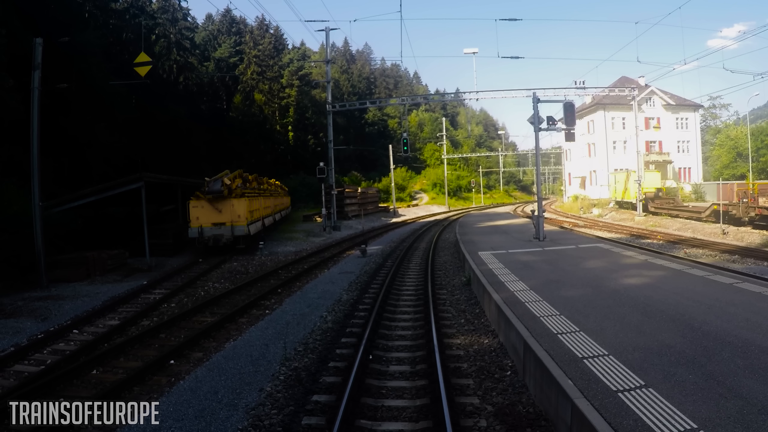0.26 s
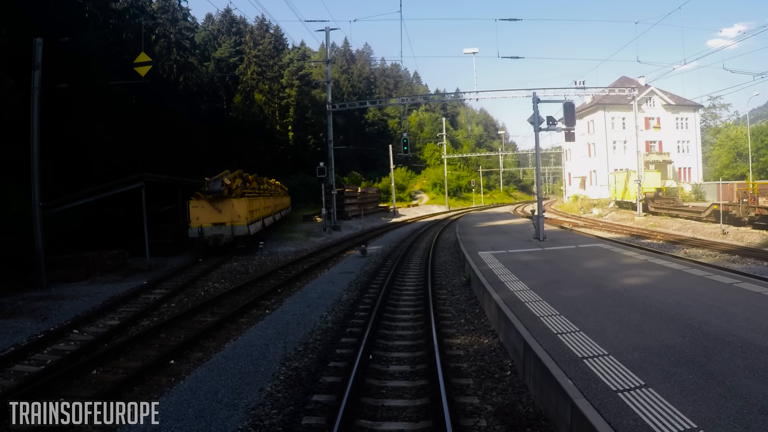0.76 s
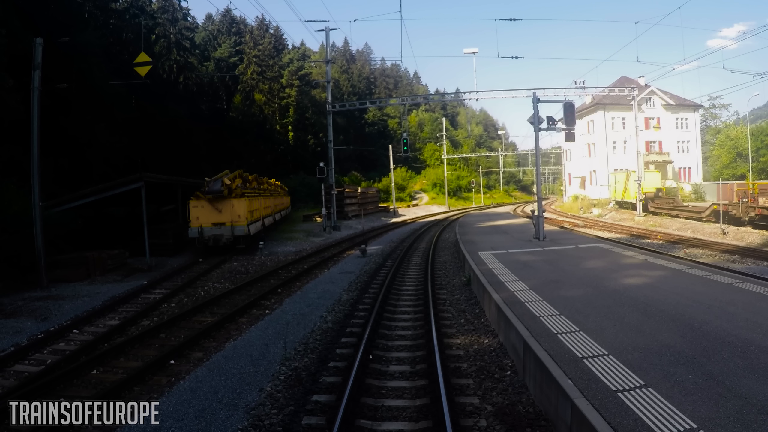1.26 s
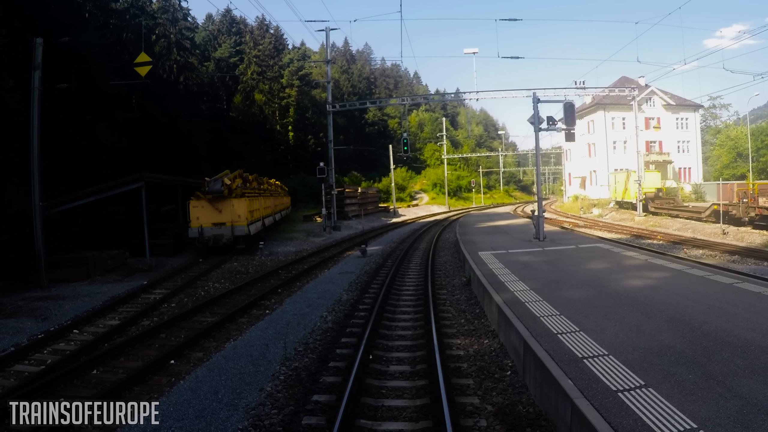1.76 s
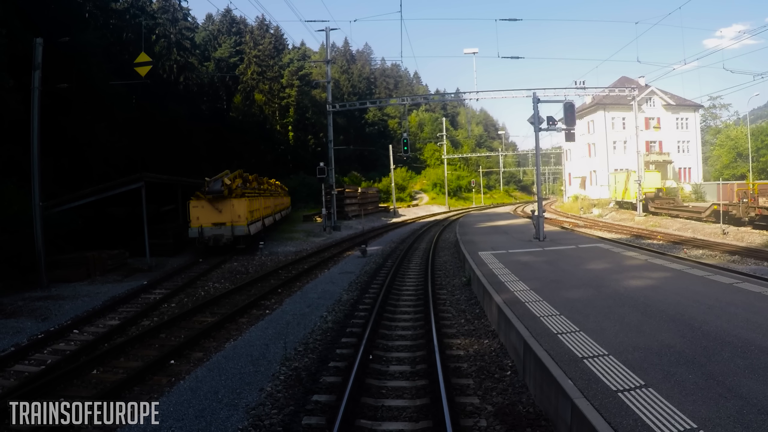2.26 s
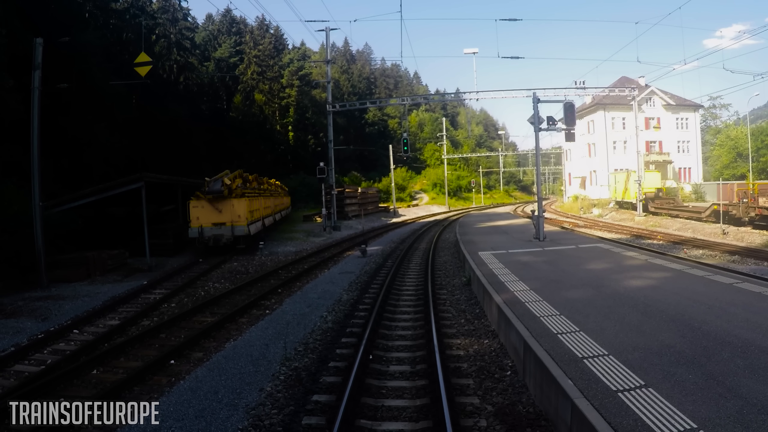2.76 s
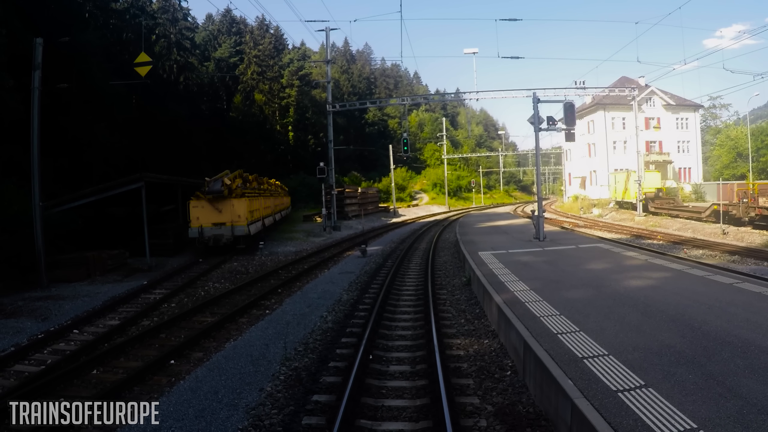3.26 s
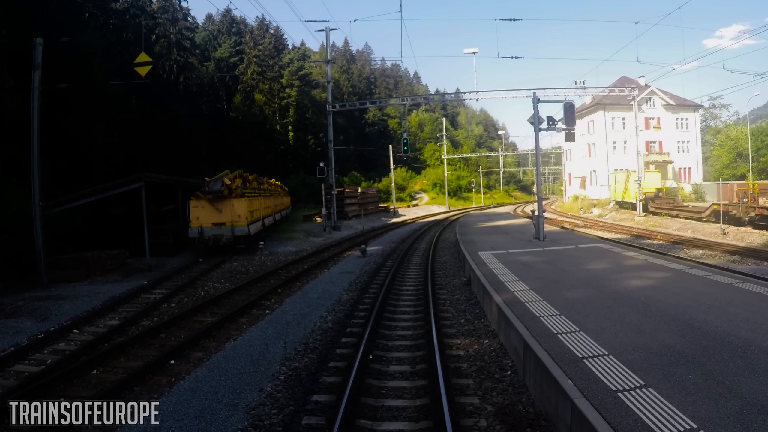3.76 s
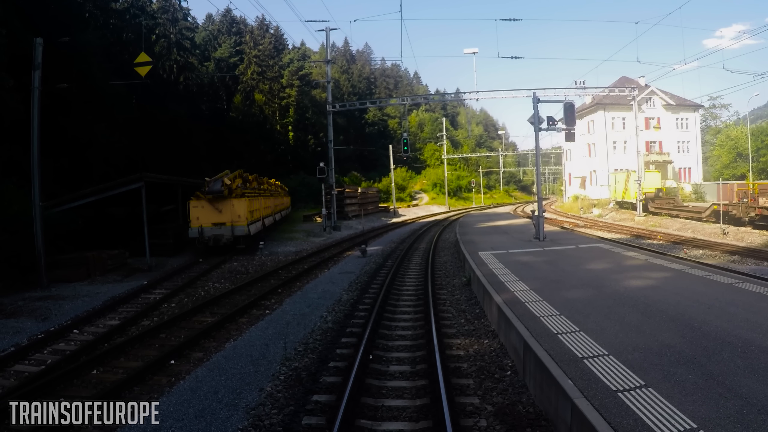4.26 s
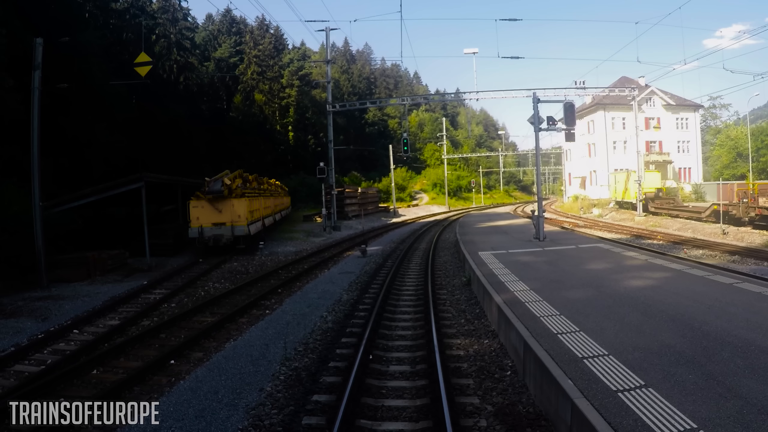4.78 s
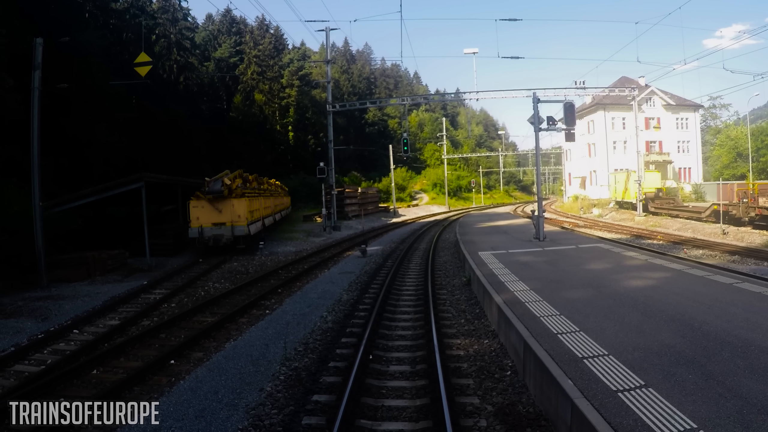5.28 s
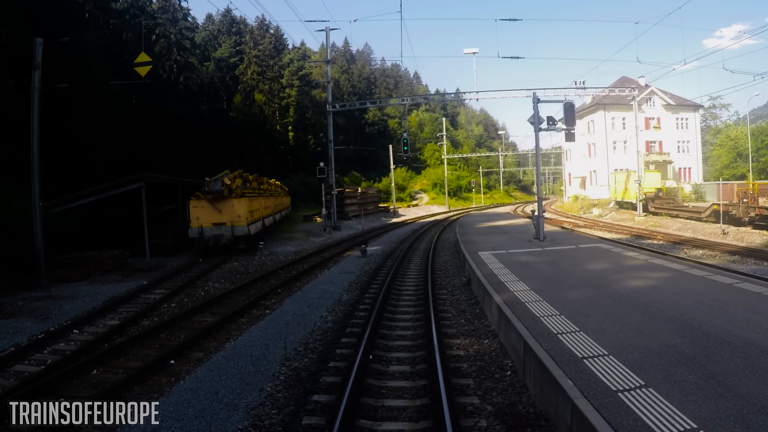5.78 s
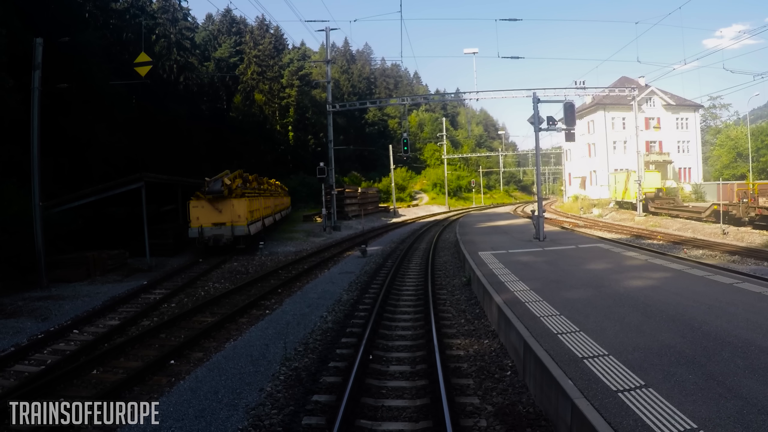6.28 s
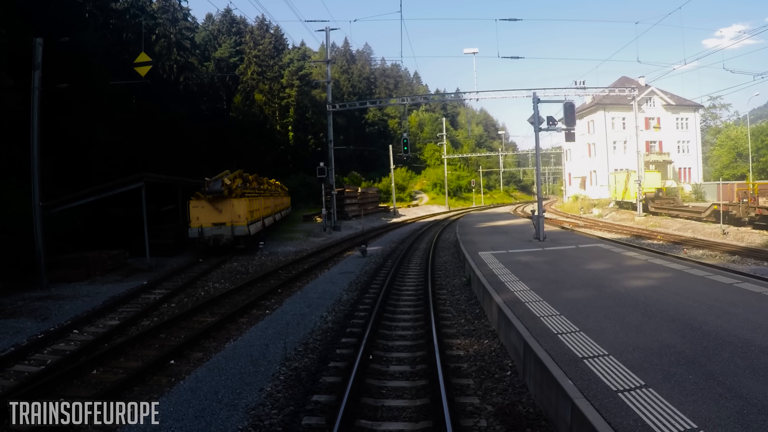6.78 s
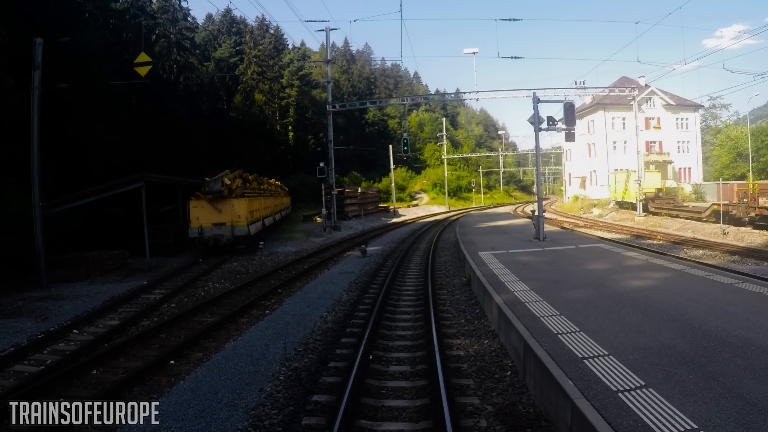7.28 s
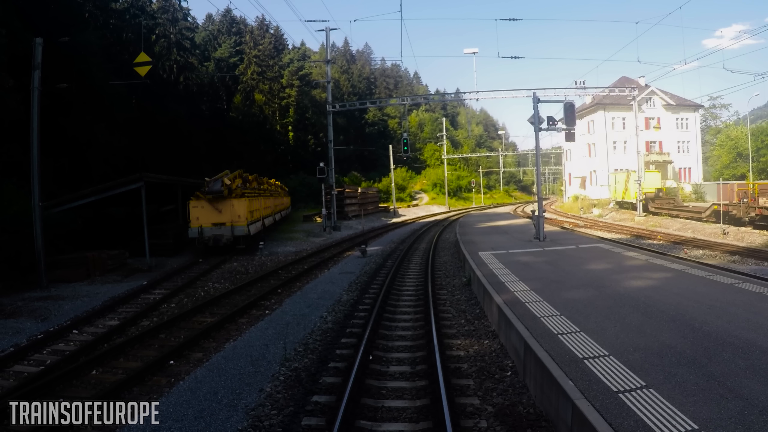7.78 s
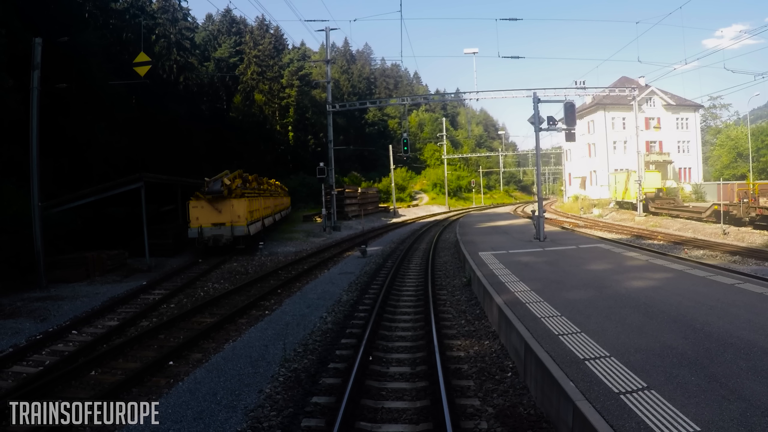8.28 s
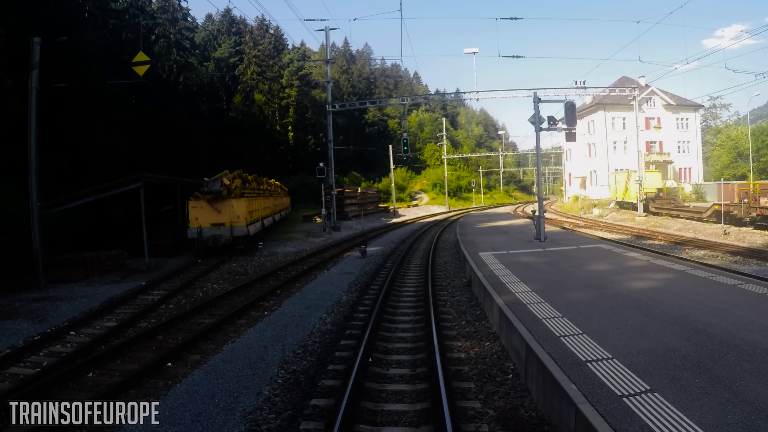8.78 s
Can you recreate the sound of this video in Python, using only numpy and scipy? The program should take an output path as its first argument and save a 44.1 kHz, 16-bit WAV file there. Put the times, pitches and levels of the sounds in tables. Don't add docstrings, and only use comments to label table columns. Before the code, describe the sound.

Low beating machine hum and muffled rushing air fill a train cab, broken by two hard lever clacks about a second apart.

```python
import sys
import numpy as np
from scipy import signal
from scipy.fft import rfft, irfft
from scipy.io import wavfile
from scipy.ndimage import uniform_filter1d

SR = 44100
rng = np.random.default_rng(int(sys.argv[2]) if len(sys.argv) > 2 else 0)


def dump_mix(stems):
    frames = np.atleast_2d(stems).T
    limited = np.clip(frames, -1, 1)
    pcm = np.round(limited * 32767).astype(np.int16)
    wavfile.write(sys.argv[1], SR, pcm)


def level_to_linear(level):
    exponent = np.asarray(level, float) / 20
    return 10 ** exponent


N = 398663
TIME = np.arange(N) / SR

# centre_hz, width_hz, level_db [dB per Hz]
CAB_MODES = [(45.3, 9, -50.5), (70, 7.1, -65.5), (142.7, 12.5, -57.5), (193, 70, -66.5), (233, 21, -63),
             (249.6, 12.6, -59.5), (278.3, 29, -63), (305, 13.8, -57), (384.8, 28.4, -59.5),
             (431.6, 47, -64), (455, 11, -79), (503, 134, -69.5),
             (597, 77, -68.5), (649, 7.7, -71), (695, 100, -76), (798, 55, -72.5), (818, 41, -68.5),
               (929, 48, -72.5), (982, 250, -82.5), (1104, 26, -82.8), (1207, 62, -76.5), (1274, 72, -79.5),
               (1348, 102, -82), (1507, 33, -83), (1674, 140, -84.5), (1850, 110, -91), (1947, 103, -89),
               (2203, 50, -96.5), (2334, 60, -91.5), (2525, 79, -85), (2970, 450, -100.6),
             (3580, 220, -100), (4230, 52, -101), (4800, 420, -106)]
# pitch_hz, level_db [dB per Hz]
AIR_FLOOR = [(20, -76), (110, -78), (350, -90), (3300, -106), (6400, -108), (7200, -112.5), (9000, -113),
             (10600, -112), (13300, -113), (14000, -117), (14600, -113), (15300, -119)]
# start_s, hiss_db, buzz_db
VALVE_AND_PANEL = [(0, -70, -69), (.8, -71.5, -55), (2, -70, -74), (3.5, -73, -65), (3.75, -65.5, -68),
                   (4.5, -64, -56), (5.5, -67.5, -57.5), (5.9, -71, -51), (7.1, -70, -63), (7.3, -72, -48),
                   (7.65, -67, -46), (7.82, -68, -65), (8.0, -68.5, -45), (8.28, -69, -57), (8.5, -72, -52),
                   (9.04, -68, -51)]
# shaft_hz (or base pitch of a hum), multiples of it that sound
MACHINE_SHAFTS = [
    (48.05, (2, 4, 11, 14, 15)),
    (41.85, (5, 10)),
    (51.08, (5, 6, 7, 8, 9)),
    (51.08, (42, 44, 45, 46, 47, 48)),
    (25.09, (7, 9, 11, 18)),
    (16.675, (2, 4, 8, 26)),
    (1, (69.75, 100.9, 139.1, 145.9, 201.8, 249.1, 594.4, 616.2, 965, 1749.2, 1782.8)),
]
MACHINE_TONES_DB = [
    [-57.5, -54.5, -63, -60.5, -66.5],
    [-39, -47],
    [-47.5, -56, -68.5, -55.5, -55],
    [-83, -90, -75, -78, -83, -75.5],
    [-61.5, -51.5, -60.5, -54],
    [-61, -49.5, -55, -51.5],
    [-64.5, -64, -62.5, -61.5, -55, -56, -57.5, -57.5, -64.5, -66.5, -79],
]
MACHINE_WAVER_DB = [2.3, 1.6, 2.4, 1.6, 4.5, 0.57, 2.1]
# start_s, level_db of its shaft tone
BLOWER_LOAD = [
    (0, -34),
    (3.5, -38.5),
    (6.2, -32),
    (9.04, -35),
]
# shaft_hz, level_db, in_step_s (moment in step with it), waver_db
BEATING_SHAFTS = [
    (48.65, -43.5, 4.844, .8),
    (41.81, -45, 4.6, 2),
    (51.08, -53, 4.681, 1.5),
    (45.16, -53, 4.729, 2.5),
]
# start_s, peak_db, rattle_ms, centre_hz, breadth_octaves
LEVER_KNOCKS = [(2.976, -49, 8, 2700, 1.4), (3.055, -28, 11, 1900, 3.2), (3.071, -18.5, 3.5, 1500, 7.1),
                (3.071, -49, 4, 5000, 0.78), (3.074, -20, 5.5, 420, 1.7), (3.076, -26.5, 6.3, 150, 0.75),
                (3.083, -18.5, 4, 930, 0.81), (3.097, -25, 4.8, 270, 0.68), (3.117, -23.5, 7.1, 245, 0.88),
                (3.892, -38.5, 5.3, 1800, 0.59), (3.914, -41, 2.5, 1800, .55),
                (4.23, -23.5, 4.4, 1510, 0.85), (4.231, -46, 5, 5200, 1.6), (4.231, -25.5, 3.9, 840, 0.68),
                (4.245, -21, 8.7, 380, 2.1), (4.251, -29.5, 15, 1240, 2.3)]
# pitch_hz, t60_s, level_db
DESK_MODES = [(142, 0.26, -5), (221.8, 0.26, 0), (270, 0.56, -7.5), (306, 0.088, -17), (380, 0.15, -7.5),
              (445, 0.11, -2), (496, 0.085, -8.5), (642, 0.09, -14), (775, 0.052, 0.5), (930, 0.077, -3.5),
              (1044, 0.041, -5.5), (1176, 0.064, -6.5), (1302, 0.073, -6), (1370, 0.063, -14.5),
              (1580, 0.06, -30), (1672, 0.08, -10.5), (1900, 0.052, -12.5), (1974, 0.04, -15),
              (2336, 0.096, -17), (2525, 0.082, -11), (2830, 0.033, -24), (3000, 0.048, -18),
              (3610, 0.043, -22), (4800, 0.05, -30), (5730, 0.039, -31)]
# pitch_hz, t60_s, level_db at the pause's start, level_db at its end
WIRING_TICKS = [(4500, 0.0042, -68, -59), (8500, .002, -86, -73), (10500, .004, -80, -78),
                (12430, 0.011, -63.5, -62.5), (13100, .005, -80, -71), (14600, .006, -71, -68)]

BLOWER_HZ = 48.06
SCAN_S, PAUSE_START_S, PAUSE_END_S = 0.02, 0.0015, 0.0062


def curve(table):
    start_s, *columns = np.transpose(table)
    return [np.interp(TIME, start_s, column) for column in columns]


def walk(rate_hz):
    hold = int(SR / rate_hz)
    steps = np.repeat(rng.standard_normal(N // hold + 1), hold)
    slewed = uniform_filter1d(uniform_filter1d(steps, hold), hold)
    return 1.37 * slewed[:N]


def resonances(hz, modes):
    return sum(level_to_linear(db) ** 2 / (1 + (2 * (hz - f) / width) ** 2) ** 2 for f, width, db in modes)


def coloured(power):
    return irfft(rfft(rng.standard_normal(N)) * np.sqrt(power * SR / 2), N)


def sine(turns, db):
    return np.sqrt(2) * level_to_linear(db) * np.sin(2 * np.pi * turns)


def tone(hz, db):
    return sine(hz * TIME + rng.random(), db)


def camera_whine(hz):
    whine_hz = 6150
    phase_s = TIME % SCAN_S
    sounding = (phase_s < PAUSE_START_S) | (phase_s > PAUSE_END_S)
    gate = uniform_filter1d(1.0 * sounding, size=30)
    loose = coloured(resonances(hz, [(whine_hz, 45, -95), (5970, 260, -102)]))
    angle = 2 * np.pi * whine_hz * TIME + walk(12)
    locked = level_to_linear(-70) * np.sin(angle) + level_to_linear(-83) * np.sin(2 * angle)
    return gate * (locked + loose)


def camera_ticks(busy):
    out = np.zeros(N)
    scans_s = np.arange(0, N / SR - 2 * SCAN_S, SCAN_S)
    t = np.arange(800) / SR
    for edge, edge_s in enumerate((PAUSE_START_S, PAUSE_END_S)):
        jitter_s = 3e-5 * rng.random(len(scans_s))
        start = ((scans_s + edge_s + jitter_s) * SR).astype(int)[:, None]
        size, pitch = rng.standard_normal((len(scans_s), 2)).T[:, :, None]
        rings = 0
        for hz, t60_s, *edge_db in WIRING_TICKS:
            level = level_to_linear(edge_db[edge] + 3.3 * size + 4.5 * busy[start] - 1.0)
            decay = np.exp(-np.log(1000) * t / t60_s)
            rings = rings + level * decay * np.sin(2 * np.pi * hz * (1 + 0.014 * pitch) * t)
        np.add.at(out, start + np.arange(len(t)), rings)
    return out


def camera():
    hz = np.fft.rfftfreq(N, 1 / SR)
    data_turn = (0.16 + 12.3 * TIME + 0.12 * walk(3)) % 1
    busy = np.exp(-((data_turn - 0.5) / 0.12) ** 2)
    crackle_modes = [(10400, 1500, -35), (13100, 1500, -38), (14900, 900, -33), (6100, 480, -18.5)]
    crackle = coloured(resonances(hz, crackle_modes)) * level_to_linear(-77 + 3.3 * walk(12)) * busy
    return camera_whine(hz) + camera_ticks(busy) + crackle


def cab_power(hz):
    floor_hz, floor_db = np.transpose(AIR_FLOOR)
    floor = level_to_linear(np.interp(np.log(hz + 1), np.log(floor_hz), floor_db)) ** 2
    return resonances(hz, CAB_MODES) + floor


def fan_roar(hz):
    spectrum = rfft(coloured(cab_power(hz)))
    octave = np.floor(np.log2(hz / 60 + 1))
    out = np.zeros(N)
    for k in np.unique(octave):
        flutter_db = 0.8 if k < 5 else 0.3
        out += irfft(spectrum * (octave == k), N) * level_to_linear(flutter_db * walk(9))
    return out


def air_flow():
    hz = np.fft.rfftfreq(N, 1 / SR)
    hiss_db, buzz_db = curve(VALVE_AND_PANEL)
    valve = coloured(resonances(hz, [(4950, 2540, -37.0), (4308, 42, -24)])) * level_to_linear(hiss_db + 1.2 * walk(10))
    buzz = sine(np.cumsum(833 + 1.5 * walk(4)) / SR, buzz_db + 1.4 * walk(12))
    whistle = sine(np.cumsum(2524 + 13 * walk(14)) / SR, -72 + 2.4 * walk(12))
    return fan_roar(hz) + valve + buzz + whistle


def floor_throb():
    load_db, = curve(BLOWER_LOAD)
    out = np.sqrt(2) * level_to_linear(load_db) * np.cos(2 * np.pi * BLOWER_HZ * TIME)
    out = out + tone(3 * BLOWER_HZ, load_db - 17 + 2.5 * walk(2.5))
    for hz, db, in_step_s, waver_db in BEATING_SHAFTS:
        turns = BLOWER_HZ * in_step_s + hz * (TIME - in_step_s)
        out = out + np.sqrt(2) * level_to_linear(db + waver_db * walk(1.16)) * np.cos(2 * np.pi * turns)
    return out


def pump():
    level = np.sqrt(2) * level_to_linear(-44.5 + 1.23 * walk(2.68))
    return level * np.sin(2 * np.pi * 301.25 * TIME + 0.61 * walk(1.3))


def machines():
    out = floor_throb() + pump()
    for (shaft_hz, multiples), levels, waver_db in zip(MACHINE_SHAFTS, MACHINE_TONES_DB, MACHINE_WAVER_DB):
        for multiple, db in zip(multiples, levels):
            out = out + tone(shaft_hz * multiple, db + waver_db * walk(1.62))
    return out


def lever():
    out, size, rattle_size = np.zeros(N), 2 ** 13, 2048
    t = np.arange(size) / SR
    bins_hz = np.fft.rfftfreq(size, 1 / SR) + 1
    hz, t60_s, mode_db = np.transpose(DESK_MODES)[:, :, None]
    decay = np.exp(-np.log(1000) * t / t60_s)
    taper = np.cos(np.pi * t * SR / size / 2)
    rings = rfft(level_to_linear(mode_db) * decay * np.sin(2 * np.pi * hz * t) * taper)
    ring_strength = np.linalg.norm(rings, axis=1, keepdims=True)
    edges = np.clip(np.minimum(t / 0.0019, (t[-1] - t) / 0.05), 0, 1)
    for start_s, peak_db, rattle_ms, centre_hz, octaves in LEVER_KNOCKS:
        grain = rng.standard_normal((len(DESK_MODES), rattle_size))
        x = t[:rattle_size] * 1000 / rattle_ms
        rung = rings * rfft(grain * np.sqrt(x) * np.exp(-x), size)
        rung = rung * ring_strength / np.linalg.norm(rung, axis=1, keepdims=True)
        scrape = rfft(grain[0] * x * np.exp(-x / 1.4), size) / bins_hz
        scrape = scrape * level_to_linear(-6) * np.linalg.norm(rung) / np.linalg.norm(scrape)
        place = (1 + (2 * np.log2(bins_hz / centre_hz) / octaves) ** 2) ** 2
        knock = irfft((rung.sum(axis=0) + scrape * (bins_hz > 100)) / place) * edges
        i = int(start_s * SR)
        out[i:i + size] += level_to_linear(peak_db) * knock / np.abs(knock).max()
    return out


def scene():
    fade = np.clip(np.minimum(TIME / 0.003, (TIME[-1] - TIME) / 0.01), 0, 1)
    mix = camera() + air_flow() + machines() + lever()
    return (mix * fade)[None]


def band_limit(x):
    return signal.sosfilt(signal.butter(12, 15200, fs=SR, output="sos"), x)


def record(dry):
    top_cut = signal.ellip(10, 0.2, 60, 15230, fs=SR, output="sos")
    mix = signal.sosfilt(top_cut, dry)
    return band_limit(mix)


dry = scene()
out = record(dry)
dump_mix(out)
```